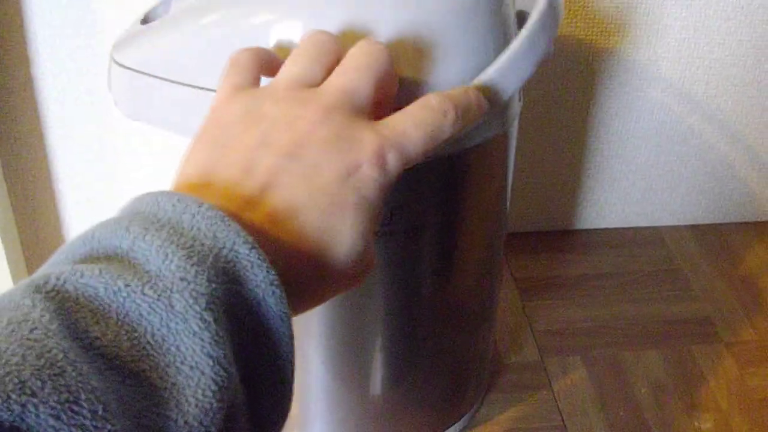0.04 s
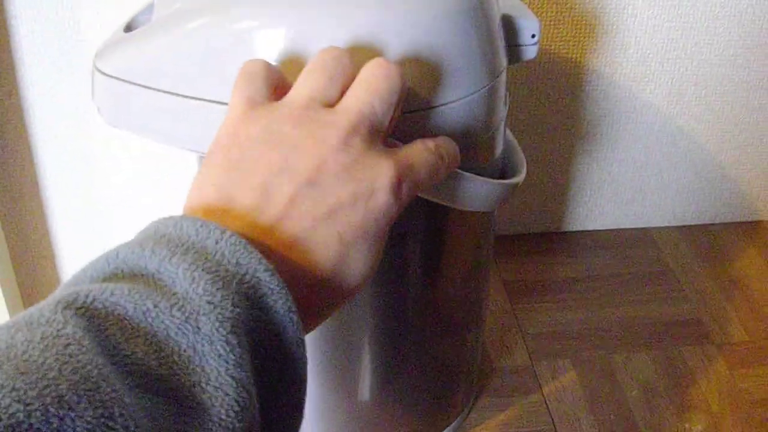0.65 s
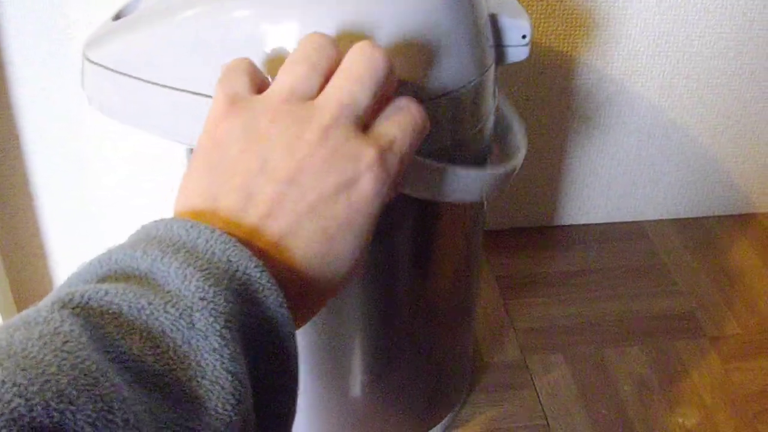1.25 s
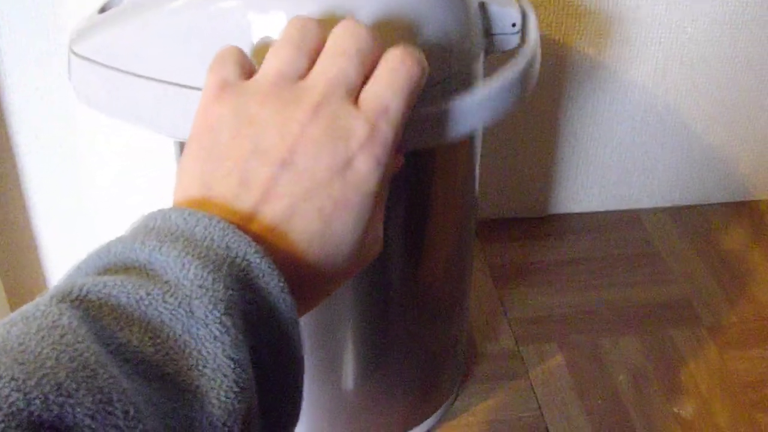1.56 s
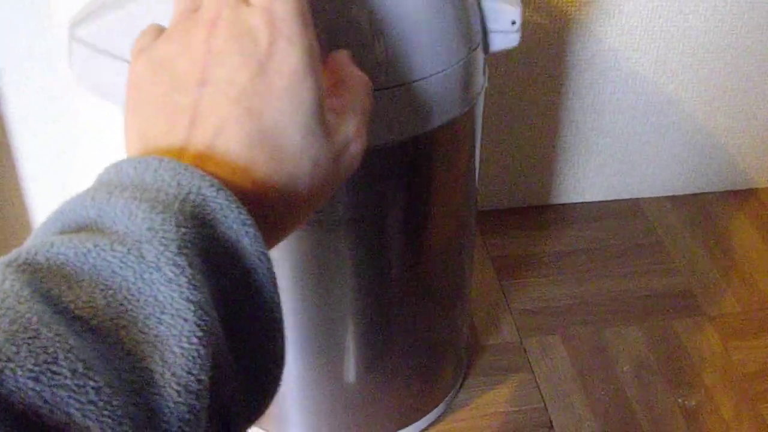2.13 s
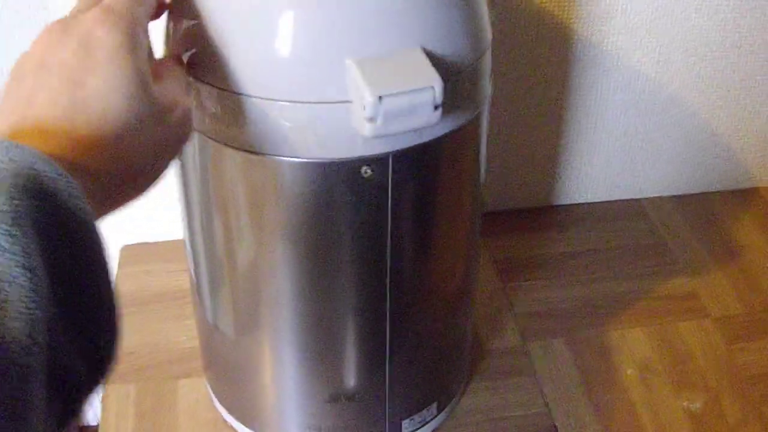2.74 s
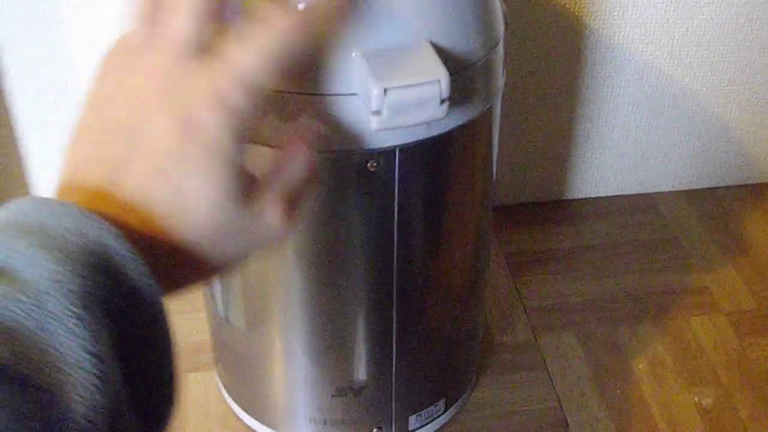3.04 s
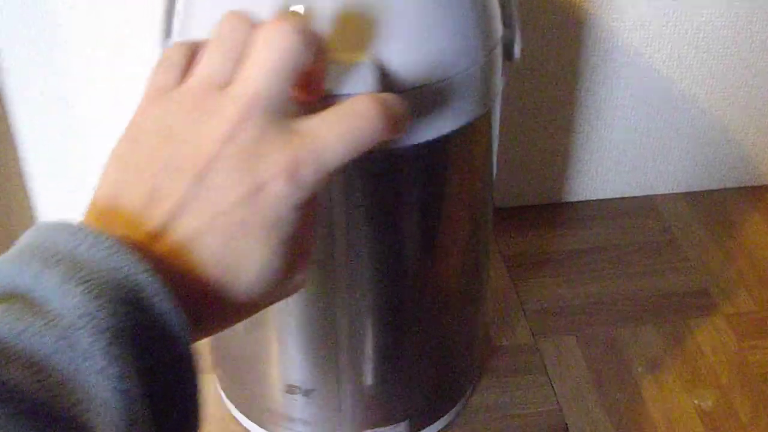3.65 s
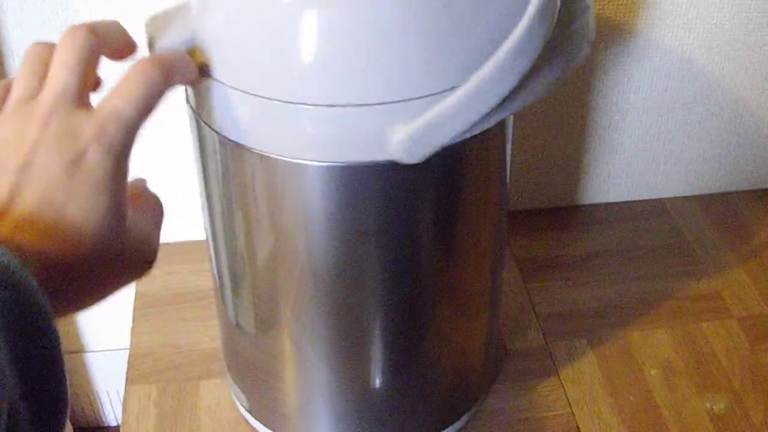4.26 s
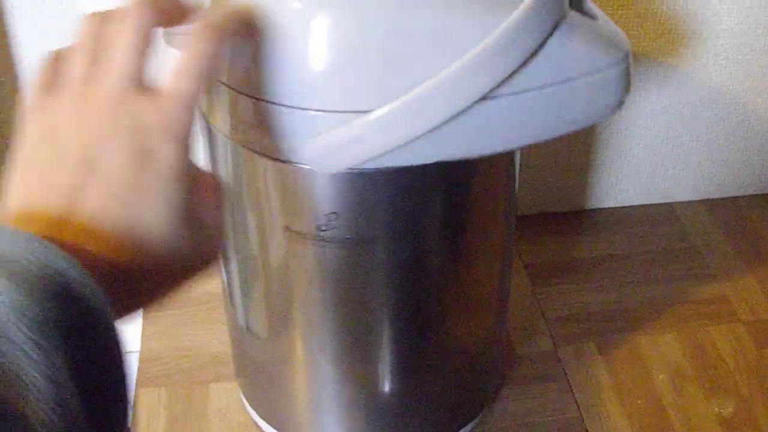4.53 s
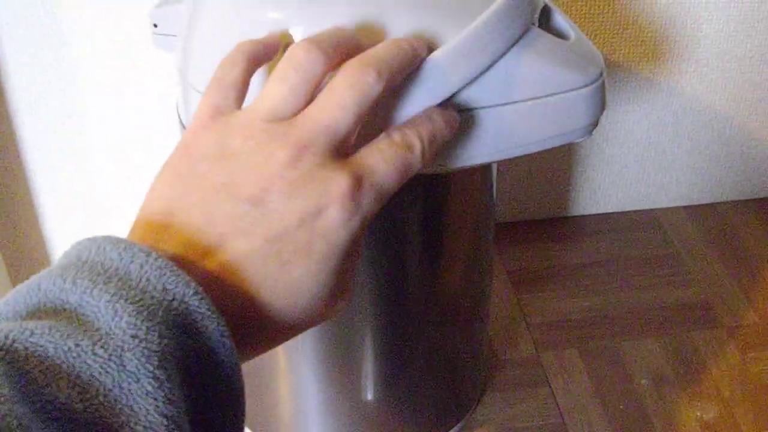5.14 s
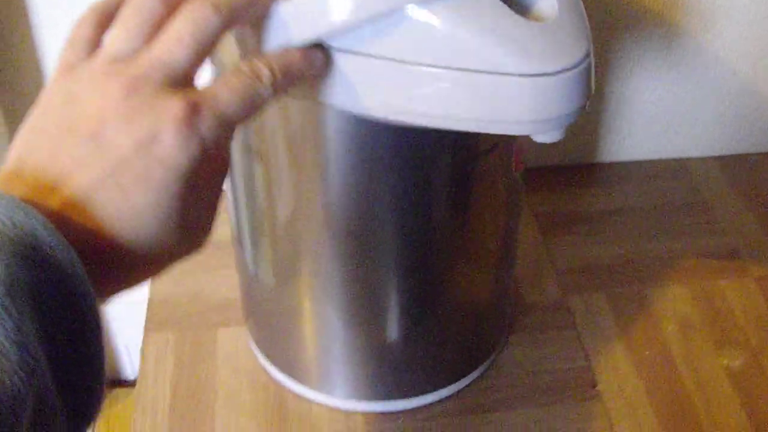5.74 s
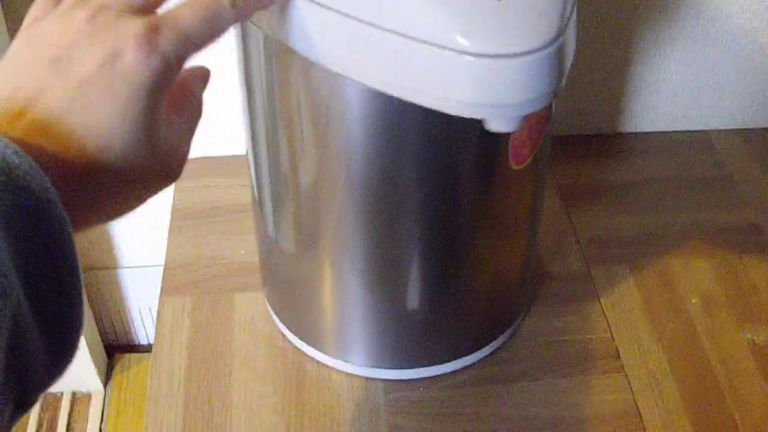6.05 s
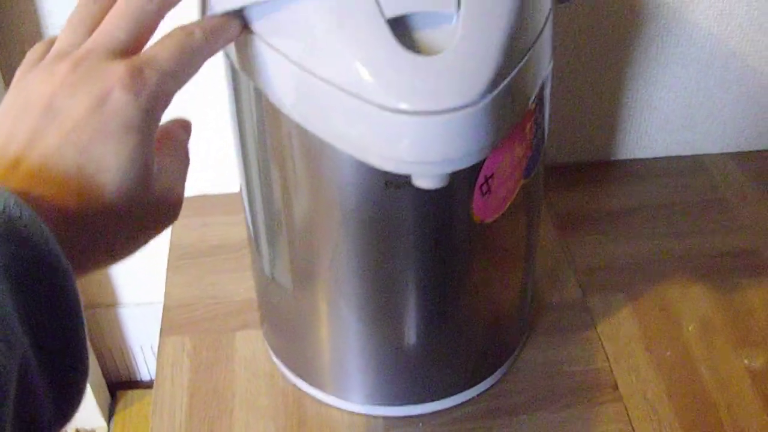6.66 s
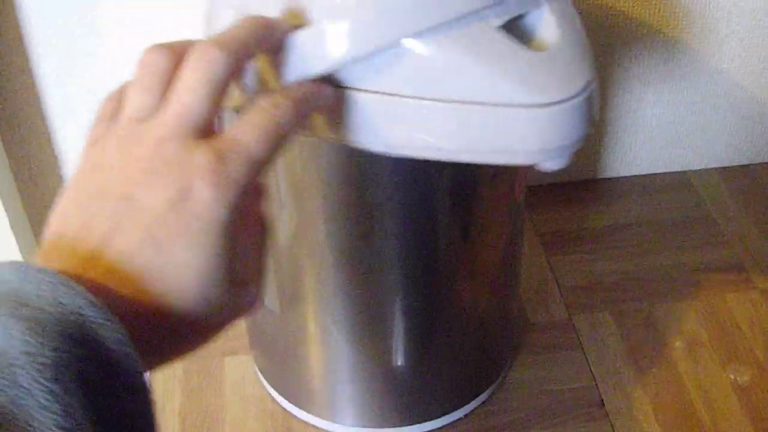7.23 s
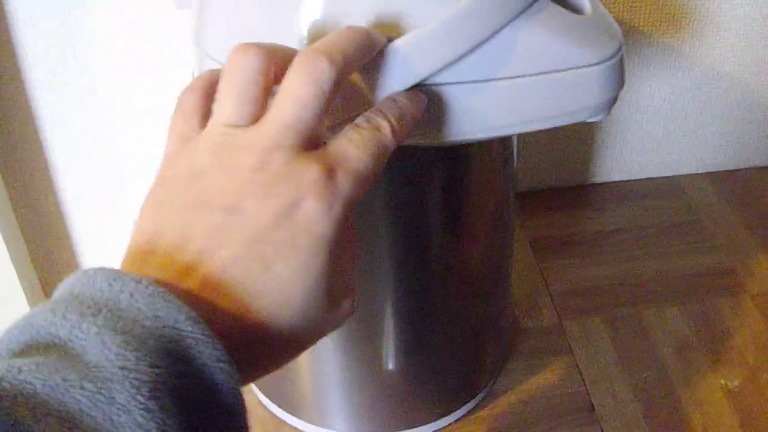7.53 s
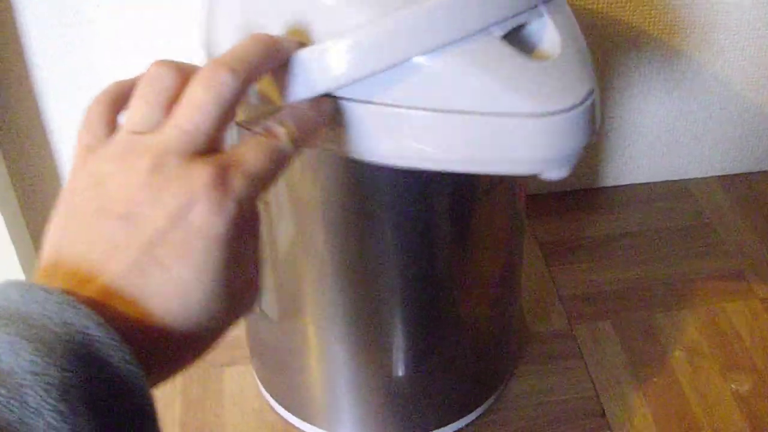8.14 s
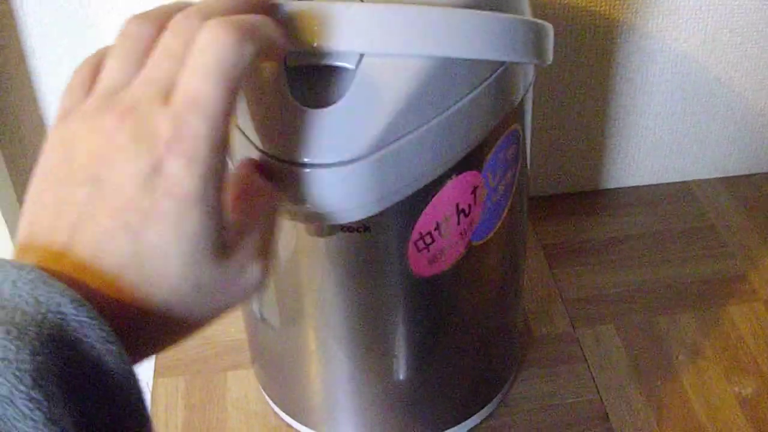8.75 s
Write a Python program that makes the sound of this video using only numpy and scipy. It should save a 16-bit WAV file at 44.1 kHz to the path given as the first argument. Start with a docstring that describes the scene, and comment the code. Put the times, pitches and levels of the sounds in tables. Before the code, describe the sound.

A plastic handle squeaks and clatters onto a steel pot, then the pot is turned with clicks and knocks on a wooden floor.

```python
"""Turning a steel pump pot

A steel pot with a plastic lid stands on a wooden floor in a small room, close to the microphone.
Its handle squeaks by stick-slip friction, swings down and bounces on the shell, exciting its modes.
A hand turns the pot in short pushes: the base knocks and scrapes, the lid ticks and rubs.
An 8-bit recorder adds quantisation noise, a gritty hiss."""
import sys
import numpy as np
from scipy import signal
from scipy.fft import rfft, irfft
from scipy.io import wavfile

SR = 44100
rng = np.random.default_rng(int(sys.argv[2]) if len(sys.argv) > 2 else 0)


def log_audio(samples):
    """Write samples as a 16-bit WAV file to the path given in sys.argv[1]."""
    # one column per channel
    frames = np.atleast_2d(samples).T
    # limit to full scale, then quantise
    limited = np.clip(frames, -1, 1)
    pcm = np.round(limited * 32767).astype(np.int16)
    wavfile.write(sys.argv[1], SR, pcm)


N = 396459
TIME = np.arange(N) / SR
RING_TIME = TIME[:SR * 3 // 4]


def from_db(db):
    """Amplitude ratio of a level in decibels."""
    return 10 ** (np.asarray(db) / 20)


def unit_rms(x):
    """Normalisation to unit power."""
    return x / np.sqrt(np.mean(x ** 2) + 1e-20)


def at_hz(rows, hz):
    """Interpolation of a spectrum table in log frequency."""
    points, *columns = np.transpose(rows)
    return [np.interp(np.log(hz), np.log(points), c) for c in columns]


def filtered(x, hz, kind, order=2):
    """Butterworth filter."""
    edges = np.clip(hz, 10, .45 * SR)
    return signal.sosfilt(signal.butter(order, edges, kind, fs=SR, output="sos"), x + 1e-18)


def add(out, s, sound):
    """Superposition of a sound starting at time s."""
    start = max(round(s * SR), 0)
    out[start:start + len(sound)] += sound[:N - start]


def decay(t, t60):
    """Exponential damping: 60 dB in t60."""
    return np.exp(-np.log(1000) * t / t60)


def ring(modes, count, spread_db=0):
    """Free vibration as a sum of damped modes, one row per blow."""
    hz, db, t60 = np.transpose(modes)
    waves = np.sin(2 * np.pi * hz[:, None] * RING_TIME) * decay(RING_TIME, t60[:, None])
    strengths = from_db(db + spread_db * rng.standard_normal((count, len(hz))))
    return strengths @ waves


def dense_modes(table, length_s, count, lag_s=0):
    """Modal overlap: decaying noise in half octaves. Dispersion delays the bass (lag_s at 1 kHz)."""
    t, out = TIME[:int(length_s * SR)], 0
    edges = 45 * 2 ** (np.arange(17) / 2)
    for low, high in zip(edges, edges[1:]):
        hz = np.sqrt(low * high)
        db, t60 = at_hz(table, hz)
        age = t - lag_s * np.sqrt(1000 / hz)
        burst = rng.standard_normal((count, len(t))) * decay(np.maximum(age, 0), t60) * (age >= 0)
        band = filtered(burst, [low, high], "band")
        energy = np.sum(band ** 2, axis=1, keepdims=True)
        out = out + band * from_db(db) * np.sqrt(2 * (high - low) / SR / energy)
    return out


def diffuse(table, count, length_s=.4, build_s=.004):
    """A diffuse field builds up as reflections multiply, then decays."""
    tails = dense_modes(table, length_s, count)
    return tails * (1 - np.exp(-(TIME[:tails.shape[1]] / build_s) ** 2))


# room response: f/Hz, level/dB, T60/s
ROOM_BANDS = [(84, -4.5, .5), (367, 0.5, 0.41), (1030, -3, 0.37), (2560, -3, 0.35), (4800, -4, .26),
              (9830, -8.5, .23)]

def reverberation(x):
    """Convolution with the room's impulse response."""
    return signal.fftconvolve(x, diffuse(ROOM_BANDS, count=1)[0])[:N]


# background spectrum: f/Hz, relative density level/dB
NOISE_SPECTRUM = [(20, -1), (55, -1), (90, -7), (150, -13.5), (250, -13.5), (340, -11.5), (500, -17),
                  (1000, -19.5), (2500, -24), (10000, -31.5)]

def ambience(level_db=-52.5):
    """Stationary noise: room rumble with a trace of microphone hiss."""
    hz = np.maximum(np.fft.rfftfreq(N, 1 / SR), 1)
    colour = from_db(at_hz(NOISE_SPECTRUM, hz)[0])
    return from_db(level_db) * unit_rms(irfft(rfft(rng.standard_normal(N)) * colour, N))


def stick_slip(hz, envelope, jitter, overtone_db, wander_hz=350):
    """Self-excited friction oscillation: three harmonics of an unsteady slip rate."""
    wander = unit_rms(filtered(rng.standard_normal(SR), wander_hz, "low"))[:len(envelope)]
    phase = 2 * np.pi * np.cumsum(hz * (1 + jitter * wander)) / SR
    return envelope * unit_rms(sum(from_db(overtone_db * k) * np.sin((k + 1) * phase) for k in range(3)))


# modes of the handle: f/Hz, level/dB, T60/s
HANDLE_RING = [(2290, -9.5, 0.15), (2810, -2, 0.16), (3590, -3, 0.21), (3670, -11, 0.15), (4100, -1, 0.11),
               (4470, -5.5, 0.16), (4870, -27, 0.14), (7100, -22, 0.19), (7200, -16, 0.24),
               (7100, -23, 0.28)]
# groans as the handle lands: t/s, duration/s, slip rate f/Hz, level/dB
PIVOT_GROANS = [(0.346, 0.041, 815, -31.5), (0.353, 0.042, 1060, -34)]

def handle_pivot(squeak_hz=3640, squeak_db=-21.5, rasp_db=-2, ring_db=-29, tone_room_db=-6):
    """Stick-slip at the pivot: a fading squeak over the ringing handle, then a groan."""
    squeak, groan = np.zeros((2, N))
    fading = from_db(squeak_db) * decay(RING_TIME, t60=0.16)
    add(squeak, 0, stick_slip(squeak_hz, fading, jitter=0.02, overtone_db=-11.5))
    for s, length_s, hz, db in PIVOT_GROANS:
        swell = from_db(db) * np.hanning(int(length_s * SR))
        add(groan, s, stick_slip(hz, swell, jitter=0.095, overtone_db=-9))
    rasp = from_db(rasp_db) * squeak * rng.standard_normal(N)   # each slip sheds a little noise
    rasp = filtered(rasp, 2100, "high", order=4)
    rasp = filtered(rasp, 5500, "low", order=1)
    tones = squeak + groan
    out = tones + rasp + reverberation(from_db(tone_room_db) * tones + rasp)
    add(out, 0, from_db(ring_db) * ring(HANDLE_RING, count=1)[0])
    return out


def contact(sound, cutoff_hz, bass_db, bass_hz=550):
    """Contact compliance removes treble; a heavy blow moves the whole pot and adds bass."""
    sound = filtered(sound, cutoff_hz, "low", order=1)
    bass = filtered(sound, bass_hz, "low", order=1)
    return sound + (from_db(bass_db) - 1) * bass


# responses to a blow: f/Hz, level/dB, T60/s
CLACK_BANDS = [(59.7, 16.5, 0.2), (162, -1.5, 0.22), (350, 15, 0.082), (473, 20, 0.071), (673, 8, 0.036),
               (1020, 23.5, 0.034), (1710, 14, 0.026), (2530, 13.5, 0.026), (4560, 21, 0.019),
               (6600, 14.5, 0.021), (9580, 16.5, 0.005), (10800, -11, 0.0045)]   # dense, heavily damped modes of lid and handle
TAIL_BANDS = [(78, 8, .45), (150, 0, 0.33), (227, 5, 0.38), (368, 19.5, .32), (697, 15.5, 0.37),
              (1010, 16.5, 0.33), (1470, 15.5, 0.3), (1960, 8.5, 0.32), (2820, 13.5, 0.23),
              (4380, 7.5, 0.31), (5900, 8.5, 0.22), (9000, 1, 0.33), (11800, 3, 0.14)]   # reverberation
BODY_RING = [(208.3, -31.5, 0.24), (230.8, -26, 0.29), (263.4, -39, 0.3), (335.7, -27, 0.31),
             (355, -21, .17), (370.6, -24, .28), (401, -32.5, 0.17), (504, -25, .23), (903, -33.5, 0.13),
             (967, -26.5, .22), (1433, -35, 0.3), (2930, -21, 0.045), (3320, -21.5, 0.026),
             (4440, -19, 0.053)]   # pot body
BASE_RING = [(75.86, -36.5, 0.41), (91.56, -35, .45), (941, -19.5, 0.034), (1138, -20.5, 0.039),
             (1176, -25.5, 0.11), (2260, -17, .05), (2570, -14.5, 0.035), (3800, -21.5, 0.054),
             (4930, -22.5, 0.11)]   # plastic base and floorboards
SHELL_RING = [(673, -30, .35), (722, -26, .25), (1019, -22, .42), (1083, -33, .3), (1228, -30, .9),
              (1414, -20, .13), (1543, -20, .13)]   # thin steel shell

def impacts(rows, shell_share, room_db, body_lag_s=.0006, radiation_hz=270):
    """Impulsive excitation: the plastic clacks; body, base, shell and room ring on."""
    out, count = np.zeros(N), len(rows)
    clacks = dense_modes(CLACK_BANDS, length_s=.12, count=count, lag_s=0.00034)
    tails = from_db(room_db) * diffuse(TAIL_BANDS, count)
    body, base, shell = (ring(m, count, spread_db=0.5) for m in (BODY_RING, BASE_RING, SHELL_RING))
    # a small pot radiates little bass
    body, shell = filtered(np.array([body, shell]), radiation_hz, "high", order=3)
    tones = body + (1 - shell_share) * base + shell_share * shell
    for k, (s, db, cutoff_hz, bass_db) in enumerate(rows):
        for lag_s, part in [(0, clacks[k]), (body_lag_s, tones[k]), (0, tails[k])]:
            add(out, s + lag_s, from_db(db) * contact(part, cutoff_hz, bass_db))
    return out


# pushes of the hand: t/s, level/dB
PUSHES = [(0.027, -26.5), (0.18, -27), (1.602, -31), (2.021, -33), (2.857, -32.5), (3.394, -32),
          (3.457, -29), (3.97, -31), (4.149, -33.5), (4.524, -21), (5.228, -31), (8.748, -29.5)]

def hand_thuds(cutoff_hz=553, bass_db=3):
    """A soft contact excites mainly the low modes."""
    return impacts([(s, db, cutoff_hz, bass_db) for s, db in PUSHES], shell_share=.05, room_db=-1.5)


# the handle drops, bounces twice and later touches again: t/s, level/dB, cutoff f/Hz, bass gain/dB
BOUNCES = [(0.3904, -5, 7750, -13), (0.397, -5, 4020, 5.5), (0.4934, -10, 4040, 5),
           (0.5465, -11, 2330, 1.5), (1.2622, -22, 2070, -3.5)]

def handle_bounces():
    """Inelastic impacts of the handle excite the steel shell."""
    return impacts(BOUNCES, shell_share=0.74, room_db=3.5)


# the base meets the floor: t/s, level/dB, cutoff f/Hz, bass gain/dB
LANDINGS = [(2.511, -26, 3700, -9), (2.7067, -2, 11300, 0.5), (2.749, -19, 11700, 3),
            (4.511, -29.5, 1190, 4), (5.1836, -33.5, 2190, -0.5), (7.4442, -16.5, 2420, 0.5),
            (8.1186, -18, 2120, -10.5), (8.592, -26.5, 2940, -1.5)]

def base_knocks():
    """Impacts of the tipping pot excite base and boards, the shell barely."""
    return impacts(LANDINGS, shell_share=.05, room_db=1)


# the clearest snaps of the lid: t/s, relative level/dB, centre f/Hz
LID_SNAPS = [(0.9386, -26.5, 5500), (1.0482, -24.5, 6000), (1.538, -22, 6270), (1.829, -29.5, 5600),
             (1.864, -29.5, 5600), (1.939, -28.5, 4220), (1.9617, -18, 7540), (2.02, -27.5, 5900),
             (2.1377, -25.5, 6330), (2.2053, -26.5, 5500), (2.5293, -21.5, 6060), (3.56, -23.5, 6440),
             (3.673, -31.5, 6140), (3.8798, -31.5, 8400), (4.0094, -30, 9300), (4.9292, -26.5, 2600),
             (4.9475, -23, 4950), (5.0049, -18, 5170), (5.0132, -20.5, 3940)]
# response to a snap: f/Hz, level/dB, T60/s
SNAP_BANDS = [(300, -3, 0.023), (1430, 2.5, 0.024), (4800, 1.5, .01), (9800, 2.5, 0.0077)]

def lid_ticks(gain_db=12, spike=0.43, width=1.9, room_db=6, give_s=0.0047, give_db=-11.5):
    """Sudden strain release: a spike, rattle and echo, coloured by the size of the part that snaps."""
    out, rows = np.zeros(N), LID_SNAPS + creaks()
    snaps = dense_modes(SNAP_BANDS, length_s=.04, count=len(rows))
    tails = diffuse(ROOM_BANDS, count=len(rows), length_s=.15)
    for (s, db, hz), snap, tail in zip(rows, snaps, tails):
        for part in (snap + spike * signal.unit_impulse(len(snap)), from_db(room_db) * tail):
            sound = from_db(db + gain_db) * filtered(part, [hz / width, hz * width], "band", order=1)
            add(out, s - give_s, from_db(give_db) * sound)   # the plastic first gives a little
            add(out, s, sound)
    return out


# the fingers shift on the lid: t/s, duration/s, relative level/dB
GRIP_SHIFTS = [(0.988, 0.44, -1), (1.801, .45, -1.5), (3.541, 0.25, -1.5), (4.033, 0.064, 2),
               (4.917, 0.078, 3.5)]

def creaks(per_s=12, base_db=-34.5, spread_db=3.5, hz=6710):
    """Intermittent slip under a shifting grip: faint, uneven ticks, as rows like LID_SNAPS."""
    rows = []
    for start_s, length_s, db in GRIP_SHIFTS:
        count = max(round(length_s * per_s), 1)
        times = start_s + length_s * (np.arange(count) + rng.random(count)) / count
        rows += [(s, base_db + db + spread_db * rng.standard_normal(), hz) for s in times]
    return rows


# the base slides on the boards: t/s, duration/s, level/dB, centre f/Hz
BASE_SCRAPES = [(2.506, 0.042, -39.5, 1560), (2.533, .16, -51, 362), (4.923, 0.025, -46, 1590),
                (5.284, 0.0083, -39.5, 990), (8.001, 0.072, -53, 1027)]

def rubs(finger_db=-59, finger_hz=4940, slips_per_s=1500, width=1.4, room_db=-2):
    """Sliding friction as shot noise: tiny random slips of fingers on lid and base on floor."""
    out = np.zeros(N)
    fingers = [(s, length_s, finger_db + db, finger_hz) for s, length_s, db in GRIP_SHIFTS]
    for s, length_s, db, hz in BASE_SCRAPES + fingers:
        size = int(length_s * SR)
        slips = rng.standard_normal(SR) * (rng.random(SR) < slips_per_s / SR)
        friction = unit_rms(filtered(slips[:size], [hz / width, hz * width], "band"))
        add(out, s, from_db(db) * friction * np.hanning(size))
    return out + from_db(room_db) * reverberation(out)


def scene():
    """Superposition of all sources at one microphone."""
    mix = ambience() + handle_bounces() + base_knocks() + hand_thuds()
    return (mix + handle_pivot() + rubs() + lid_ticks())[None]


def record(dry, step=.0055, cutoff_hz=11800):
    """Quantisation to 8 bits at half rate: rumble flips the lowest bit into hiss; overloads clip."""
    samples = signal.resample_poly(dry, 1, 2, axis=1)
    stored = step * np.clip(np.floor(samples / step), -128, 127)
    played = signal.resample_poly(stored, 2, 1, axis=1, window=("kaiser", 6))[:, :N]
    return filtered(played, cutoff_hz, "low", order=12)


dry = scene()
out = record(dry)
log_audio(out)
```